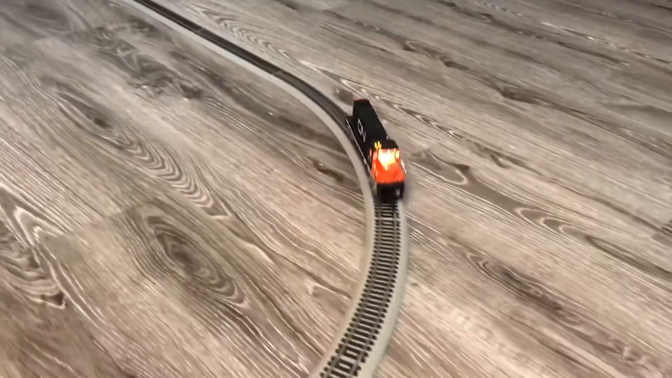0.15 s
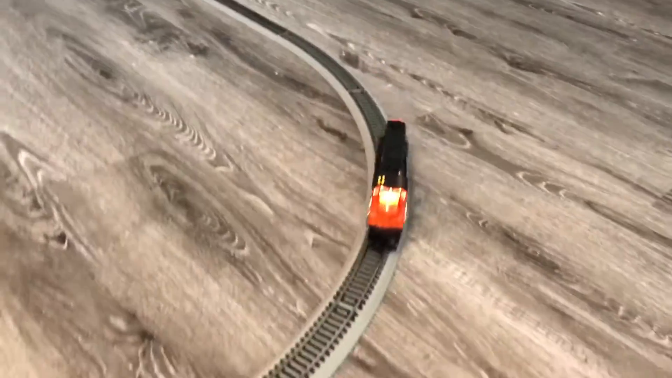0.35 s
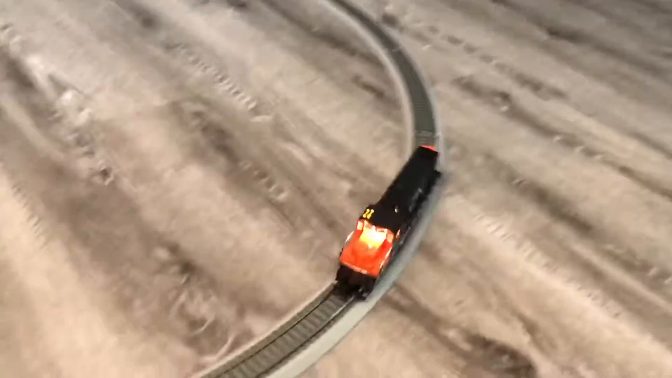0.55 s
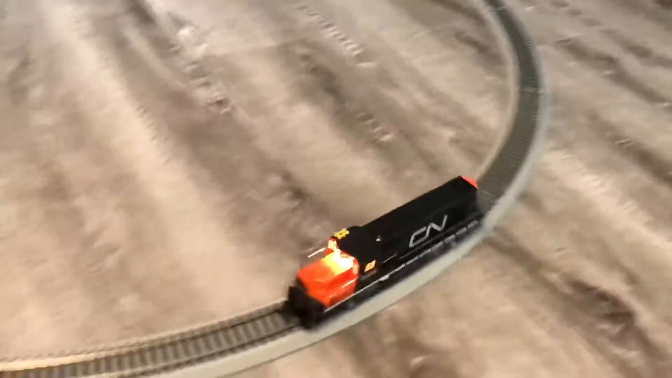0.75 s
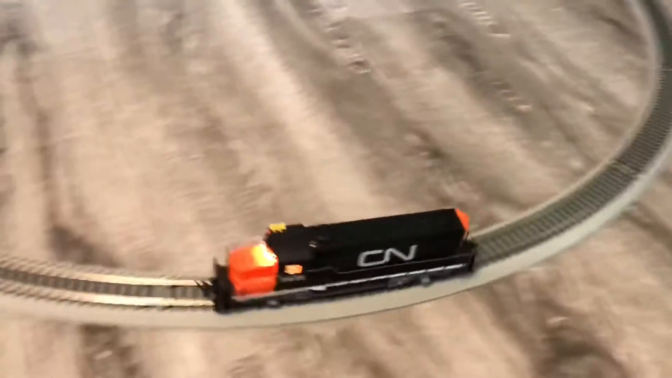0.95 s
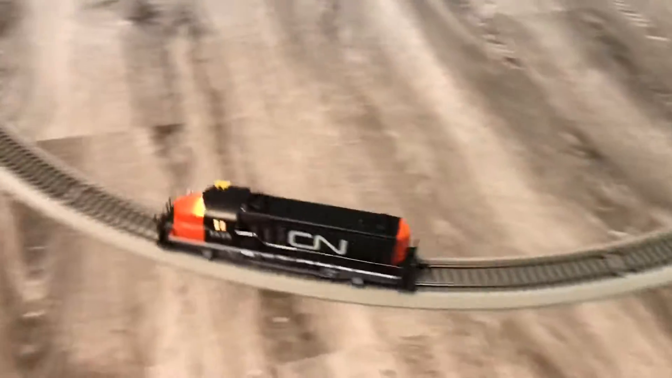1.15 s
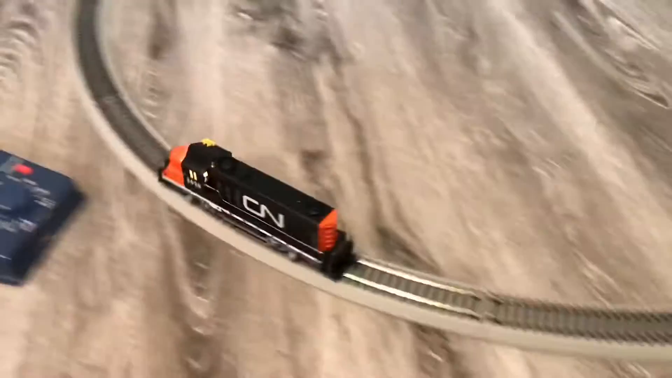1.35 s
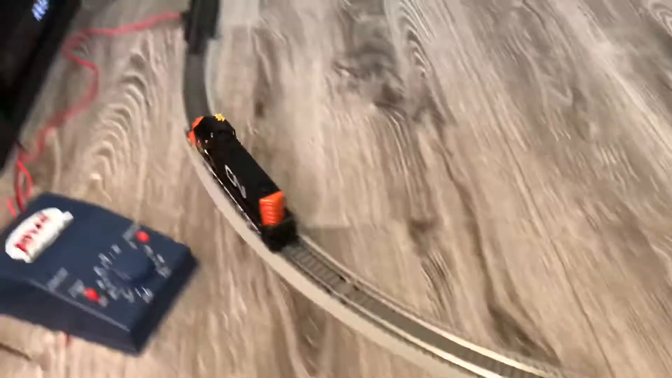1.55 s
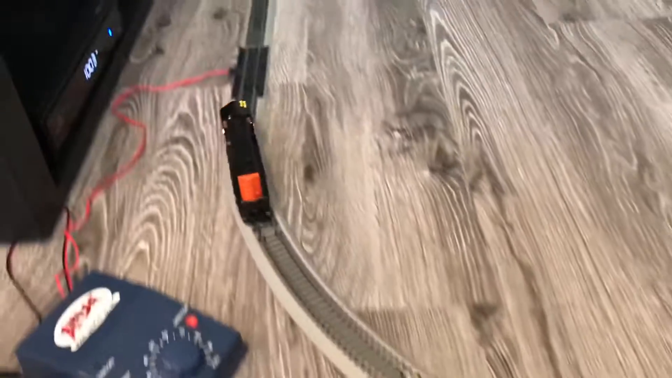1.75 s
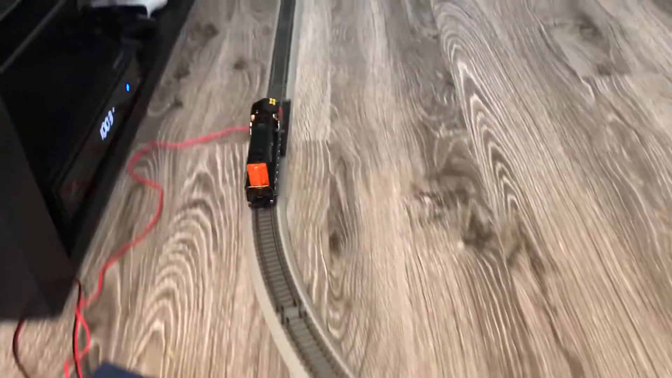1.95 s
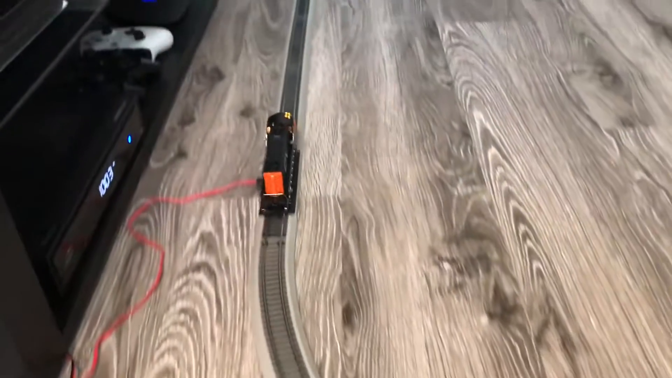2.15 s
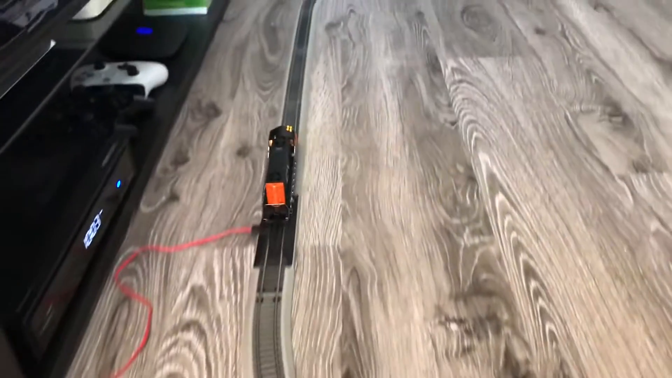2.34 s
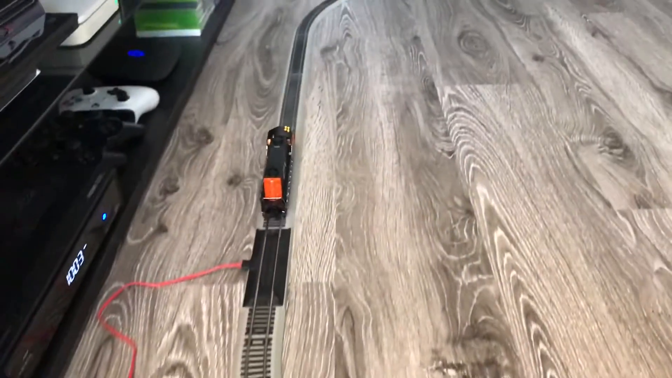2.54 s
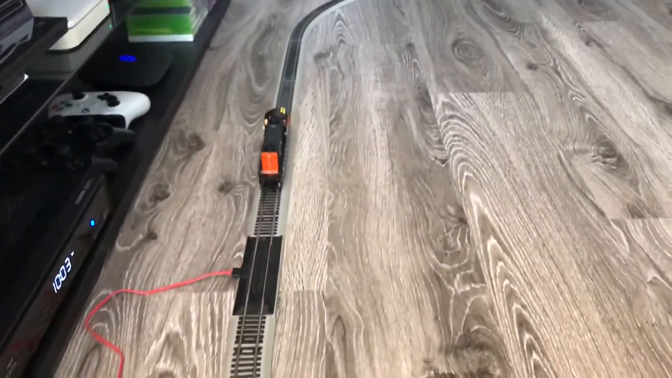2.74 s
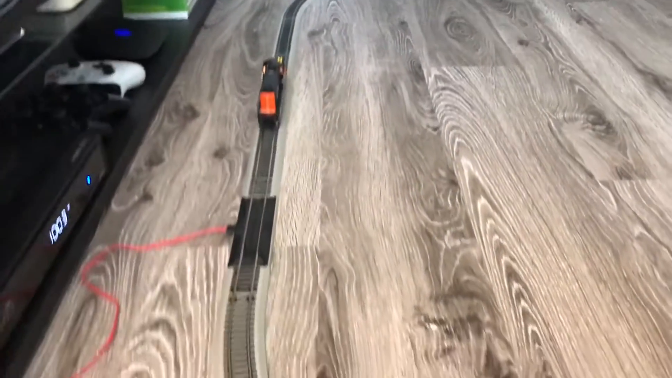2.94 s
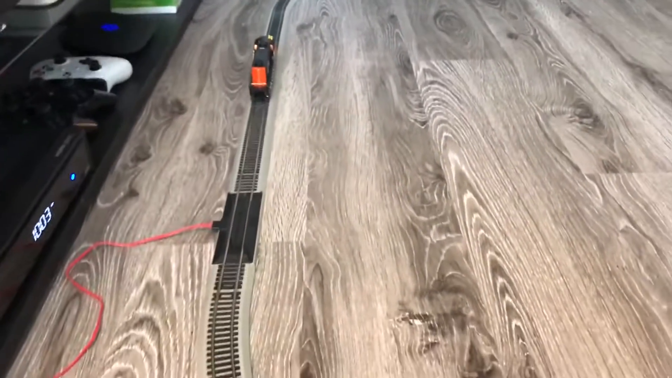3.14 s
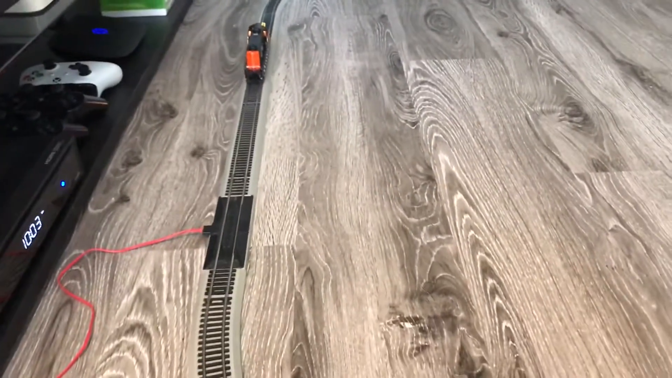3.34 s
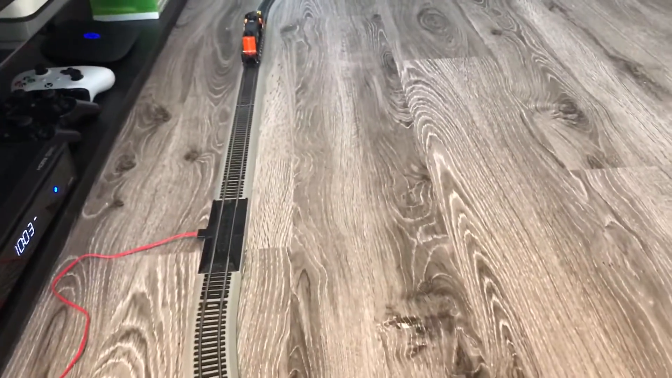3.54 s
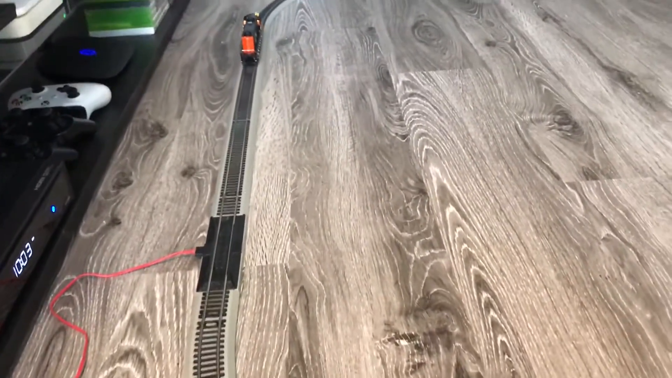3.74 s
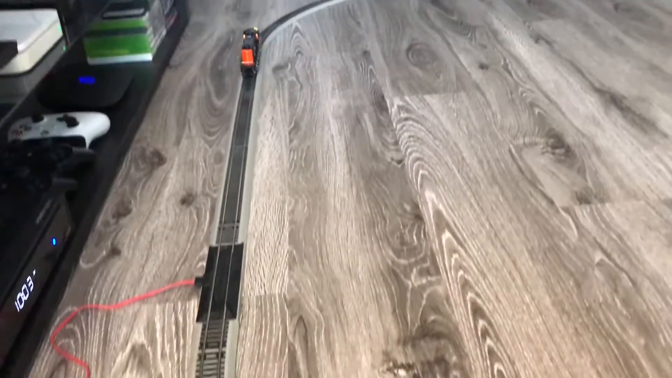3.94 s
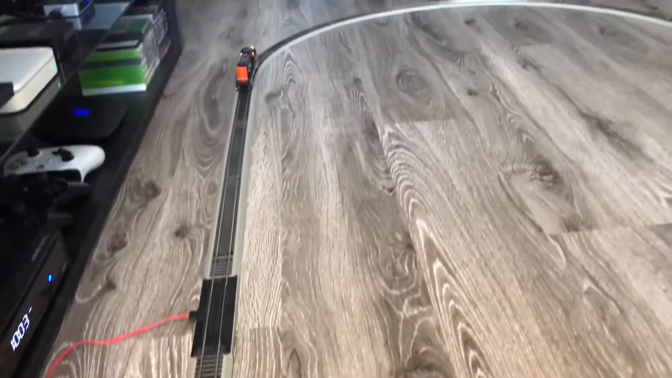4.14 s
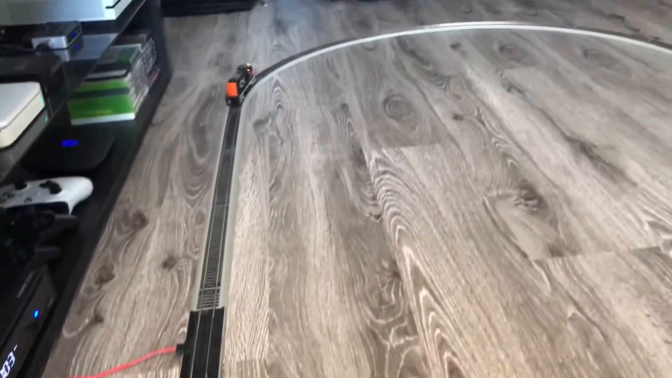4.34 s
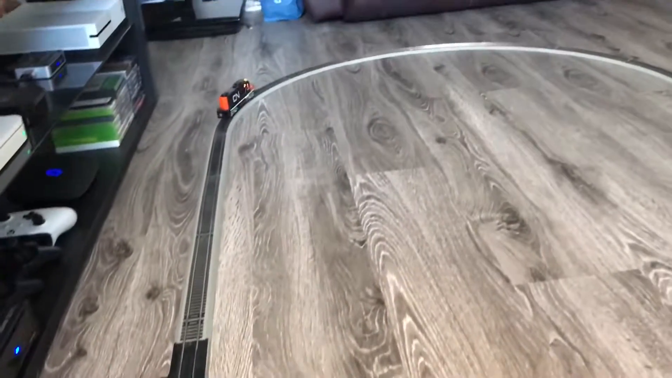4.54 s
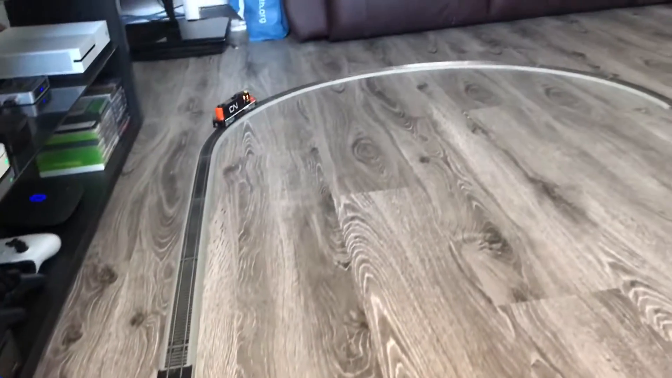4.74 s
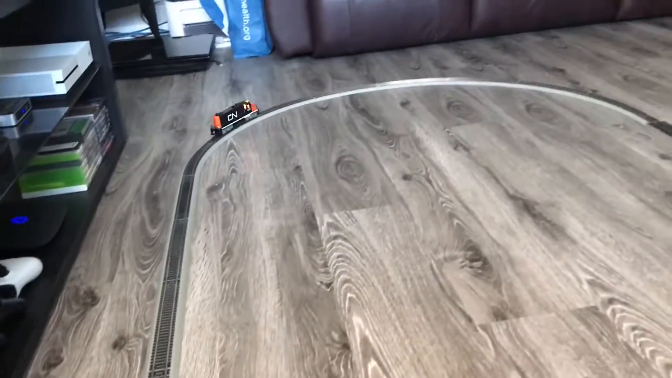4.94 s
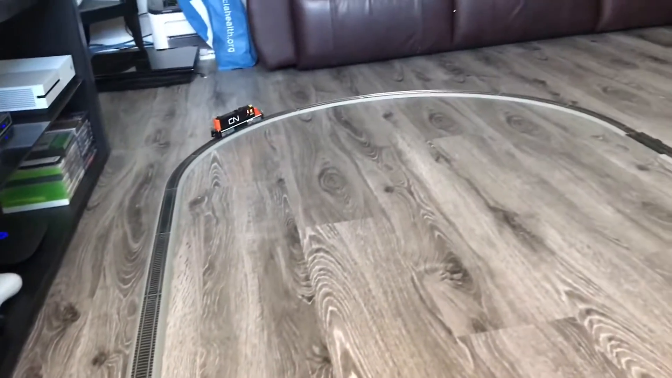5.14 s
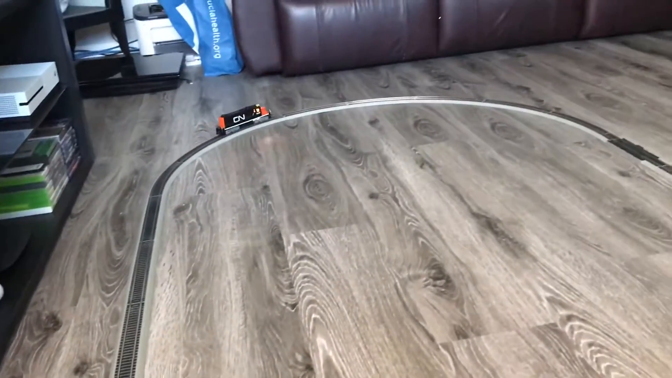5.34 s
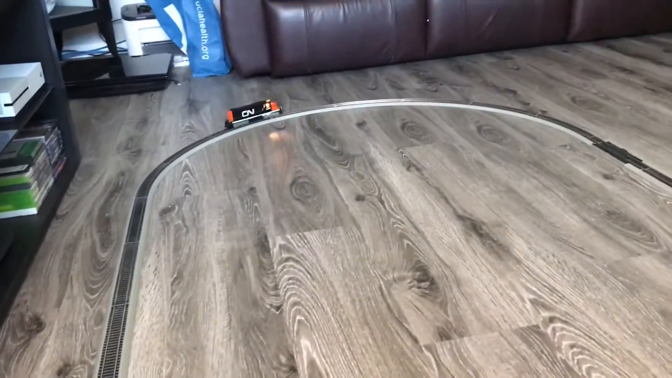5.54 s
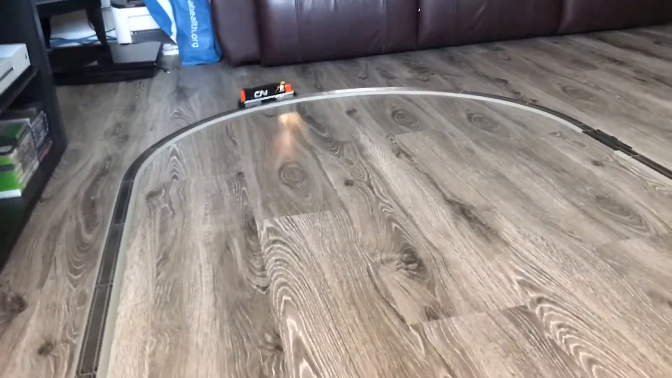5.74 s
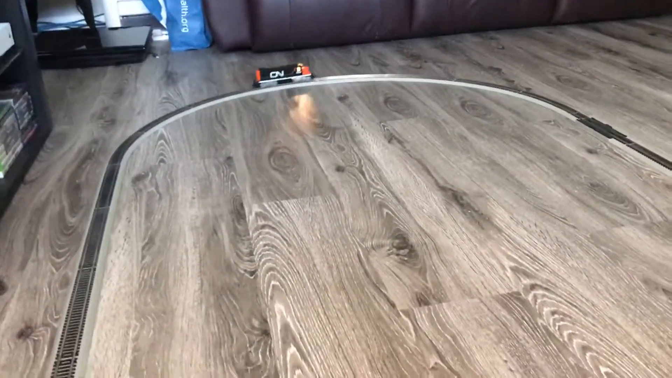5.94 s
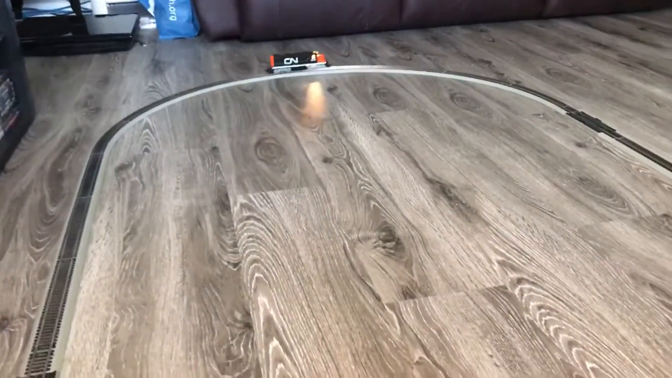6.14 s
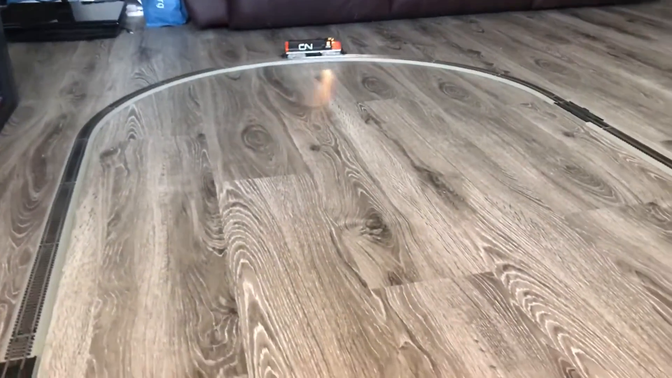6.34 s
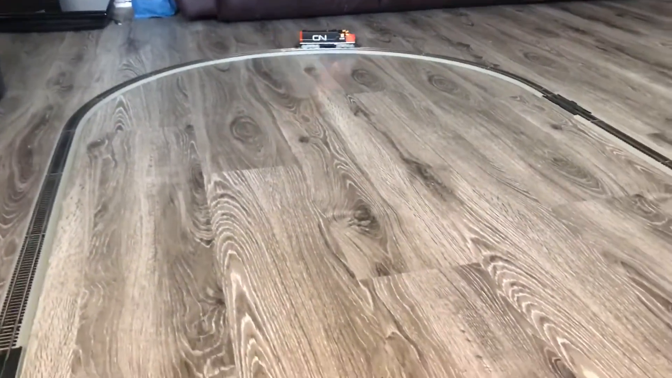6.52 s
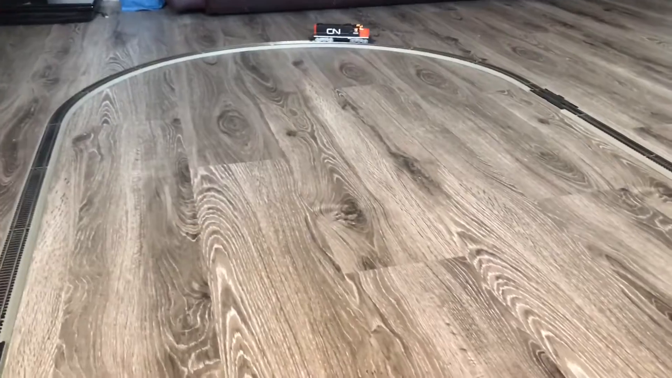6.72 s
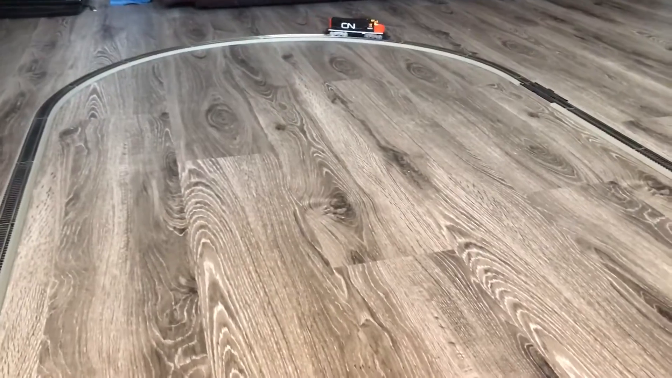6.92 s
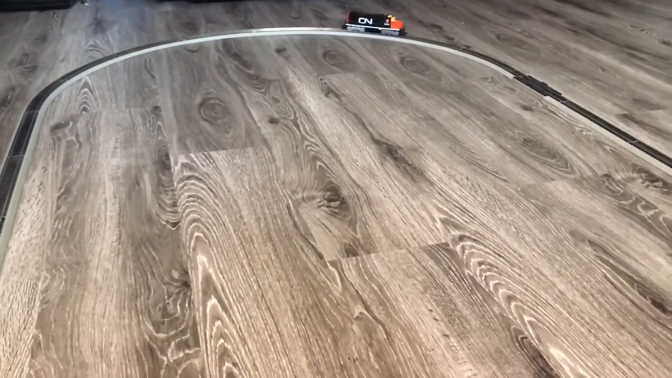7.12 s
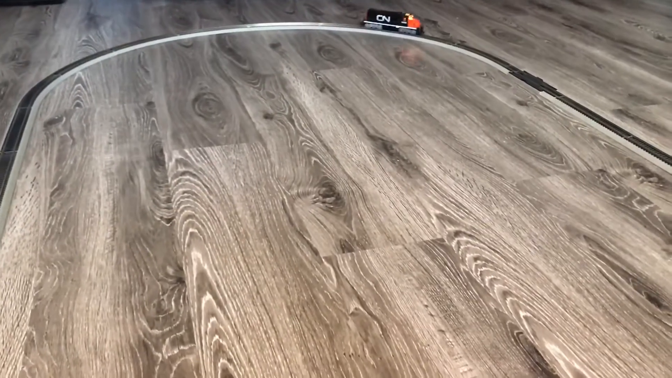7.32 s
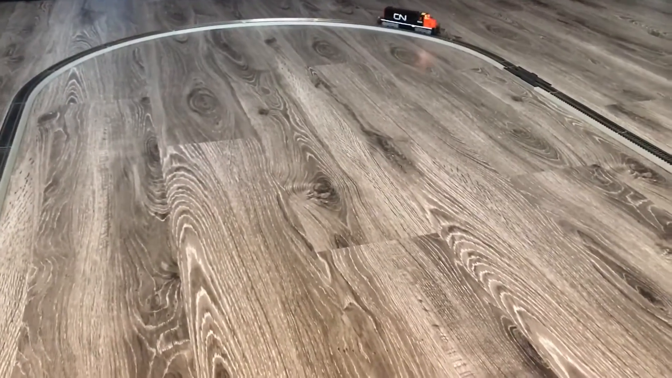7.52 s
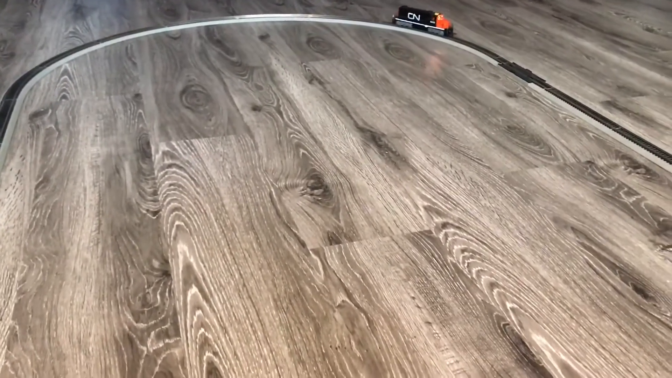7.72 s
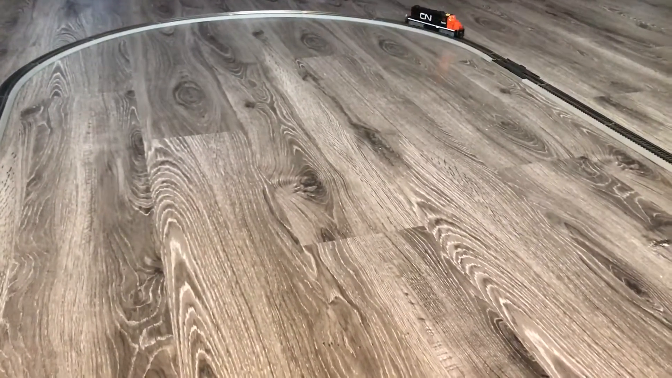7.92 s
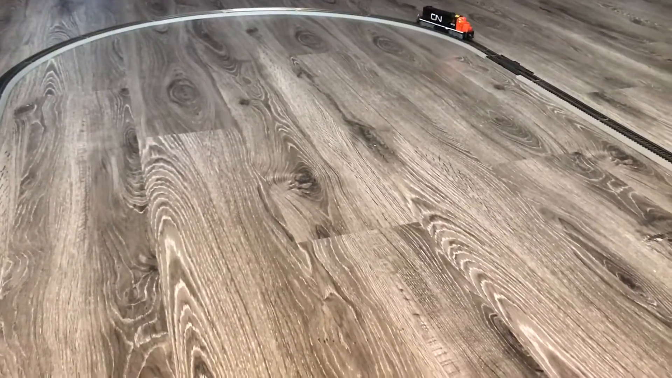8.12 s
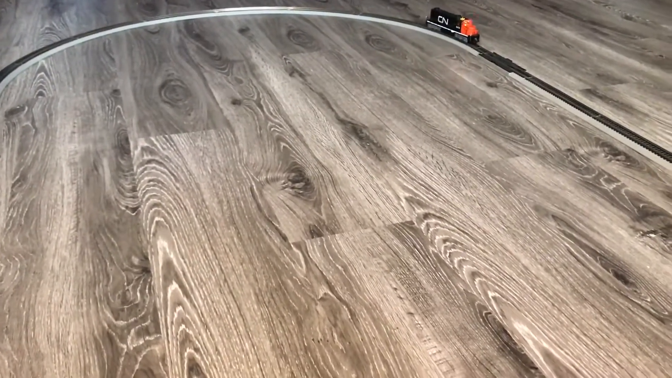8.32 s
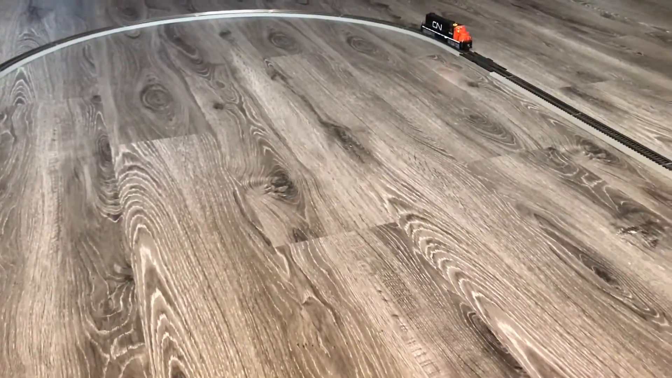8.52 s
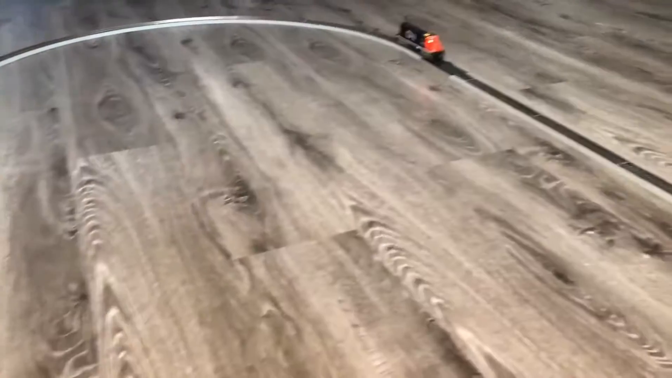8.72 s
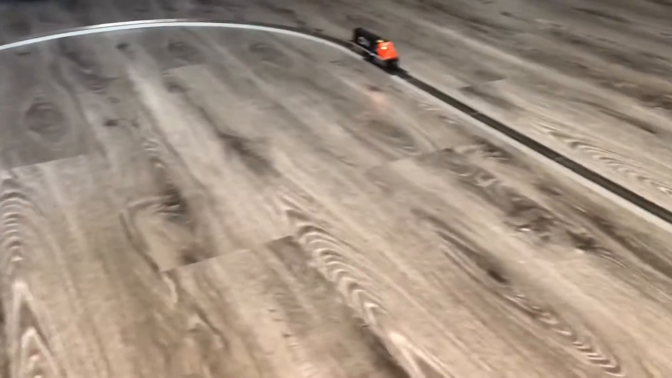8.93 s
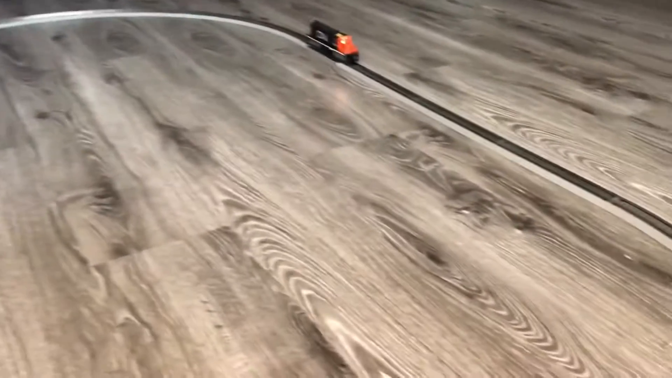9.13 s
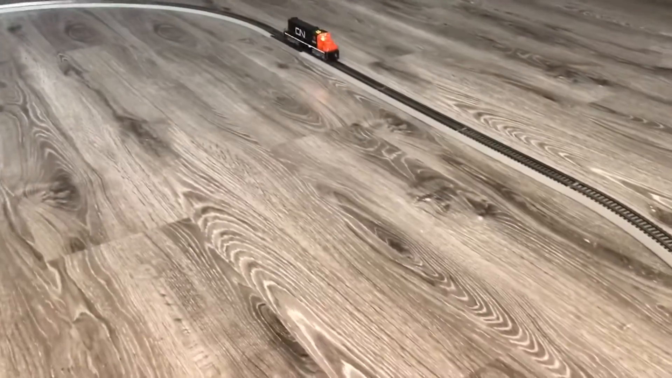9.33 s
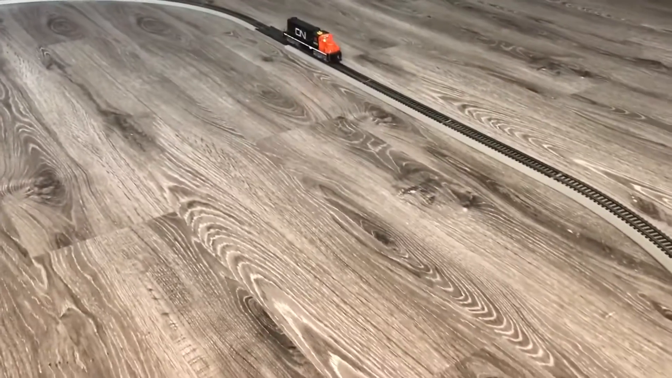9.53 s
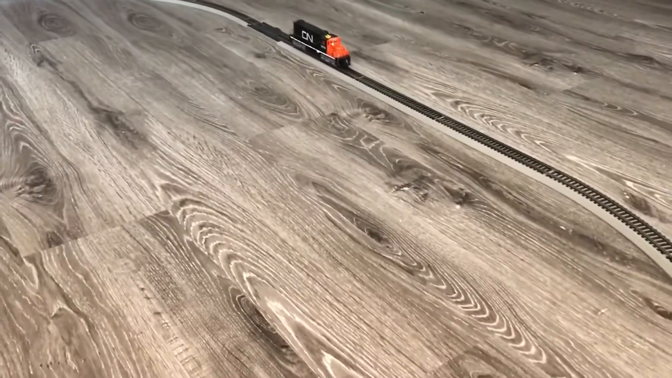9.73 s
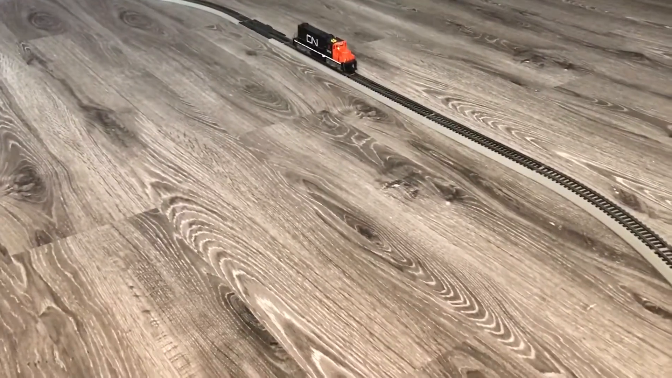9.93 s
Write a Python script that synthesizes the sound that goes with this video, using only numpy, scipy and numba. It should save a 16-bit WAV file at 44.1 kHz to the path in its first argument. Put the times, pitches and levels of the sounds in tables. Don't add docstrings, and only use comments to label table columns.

```python
import sys
import numpy as np
from scipy import signal
from scipy.io import wavfile
from scipy.ndimage import uniform_filter1d
from numba import njit

SR = 44100
rng = np.random.default_rng(int(sys.argv[2]) if len(sys.argv) > 2 else 0)


def ratio(d):
    e = np.asarray(d, float) / 20
    return 10 ** e


def unload_audio(sound):
    columns = np.transpose(np.atleast_2d(sound))
    steps = np.round(np.clip(columns, -1, 1) * 32767)
    wavfile.write(sys.argv[1], SR, steps.astype(np.int16))


N = 439677
T_S = np.arange(N) / SR


def level(x, db):
    return x * ratio(db) / np.sqrt(np.mean(x ** 2))


def columns(table):
    s, *rest = np.transpose(table)
    return [np.interp(T_S, s, c) for c in rest]


def bumps(times_s, sizes, widths_s):
    out = np.zeros(N)
    for s, size, width in zip(times_s, sizes, np.broadcast_to(widths_s, len(times_s))):
        span = slice(max(int((s - 4 * width) * SR), 0), int((s + 4 * width) * SR))
        out[span] += size * np.exp(-((T_S[span] - s) / width) ** 2)
    return out


def add(out, s, x):
    i = int(s * SR)
    out[i:i + len(x)] += x[:N - i]


def walk(rate_hz):
    hold = int(SR / rate_hz)
    held = np.repeat(rng.standard_normal(16000)[:N // hold + 1], hold)
    slewed = uniform_filter1d(uniform_filter1d(held, hold), hold)
    return level(slewed[:N], 0)


def sine(hz):
    return np.sin(2 * np.pi * np.cumsum(hz) / SR)


def strand(hz, rate_hz):
    phase = 2 * np.pi * np.cumsum(hz) / SR
    return walk(rate_hz) * np.cos(phase) + walk(rate_hz) * np.sin(phase)


@njit
def svf(x, hz, width):
    y, b, l = np.empty(len(x)), 0., 0.
    g, k = np.tan(np.pi * hz / SR), width / hz
    for i in range(len(x)):
        v = (b + g * (x[i] - l)) / (1 + g * (g + k))
        b, l, y[i] = 2 * v - b, l + 2 * g * v, k * v
    return y


def band(hz, width_hz):
    once = svf(rng.standard_normal(N), 1. * hz, 1.55 * width_hz)
    return level(svf(once, 1. * hz, 1.55 * width_hz), 0)


# time in seconds, tooth rate in Hz, level in dB.
WHINE = [(0, 1680, -57), (.62, 1754, -49), (.7, 1773, -29.5), (1.16, 1563, -34.5), (1.8, 1690, -44),
         (1.86, 1719, -32), (2.06, 1890, -24.5), (2.38, 1810, -35.5), (2.8, 1835, -35), (4.0, 1780, -37.5),
         (5.3, 1785, -35), (6.1, 1800, -34.5), (7.0, 1750, -37), (7.95, 1610, -36.5), (8.15, 1522, -37),
         (8.7, 1441, -39.5), (9.35, 1667, -34), (9.97, 1520, -39)]
# time in seconds, swell in dB.
GEAR_SURGES = [(.78, -8), (1.56, 7), (1.95, 3), (2.47, 6), (3.64, 4), (4.0, -5), (4.11, 2), (4.2, 3),
               (4.41, 5), (4.66, -4), (4.76, 6.5), (5.11, 3.5), (5.72, 2.5), (5.9, 7), (6.13, 4), (6.32, 7),
               (6.459, 6), (6.56, 5), (6.74, 7), (6.86, 7), (7.219, 7), (7.32, 4), (7.72, -4), (7.86, 3),
               (8.16, 6), (8.41, 6), (8.98, 3.5), (9.2, 3), (9.63, 3), (9.75, -3)]
SURGE_S, SAG_HZ_PER_DB = .035, 6.5
# turn multiple, level in dB.
STRANDS = [(-4, -15), (-3, -16), (-2, -3), (-1, 0.5), (0, 2), (1, 2), (2, -10.5), (3, -9.5)]
TEETH = 24
# time in seconds, level over the others in dB.
CLEAR_STRAND = [
    (0, -20),
    (1.95, -20),
    (2.03, 8),
    (2.2, 8),
    (2.36, 2),
    (2.6, -6),
    (10, -6),
]
# time in seconds, third overtone level in dB.
REAR_OVERTONES = [(0, -62), (1.6, -58), (1.85, -50), (2.2, -48), (3.4, -45.5), (4.4, -52), (6.0, -47.5),
                  (7.5, -50.5), (7.8, -55.5), (9.97, -56)]
SECOND_DB, SECOND_PEAK_S, SECOND_FALL_DB_PER_S = -46.5, 3.46, 3.5
HIGH_DB, HIGH_GAIN_DB_PER_S = -3.5, 0.4
OVERTONE_SHARP = 1.012
SLOW_S, SLOW_HALF_S, SLOW_SECOND_DB = 7.7, .14, 15


def gears():
    hz, db = columns(WHINE)
    surge_db = bumps(*np.transpose(GEAR_SURGES), SURGE_S)
    db = db + surge_db + .8 * walk(40)
    hz = (hz - SAG_HZ_PER_DB * surge_db) * (1 + .008 * walk(10))

    spread = np.interp(T_S, [.98, 1.1, 1.45, 1.53], [1, 2.2, 2.2, 1])
    tone = 0
    for turn, strand_db in STRANDS:
        strand_gain = ratio(strand_db + .9 * walk(22))
        tone = tone + strand_gain * strand(hz * (1 + turn * spread / TEETH), 90)
    clear_db = columns(CLEAR_STRAND)[0]
    clear_gain = ratio(clear_db + 2.5 + 2.0 * walk(30))
    tone = level(tone, 0) + clear_gain * sine(hz * (1 + .012 * walk(35)))
    tone = tone / np.sqrt(1 + ratio(2 * clear_db))

    third_db = columns(REAR_OVERTONES)[0]
    high_db = third_db + HIGH_DB + HIGH_GAIN_DB_PER_S * T_S + 1.1 * walk(2.51)
    second_db = SECOND_DB - SECOND_FALL_DB_PER_S * np.abs(T_S - SECOND_PEAK_S)
    second_db = np.minimum(second_db, third_db + 8)
    second_db = second_db + bumps([SLOW_S], [SLOW_SECOND_DB], SLOW_HALF_S)
    even_hz = OVERTONE_SHARP * uniform_filter1d(hz, size=9000) * (1 + .013 * walk(16))
    upper = ratio(second_db + 1.5 * walk(25)) * strand(2 * even_hz, 800)
    upper = upper + ratio(third_db + 2.2 * walk(20)) * strand(3 * even_hz, 560)
    upper = upper + ratio(high_db) * (strand(4 * even_hz, 750) + ratio(-2.0) * strand(5 * even_hz, 850))

    brush_db = np.interp(T_S, [7, 7.6], [-66, -58]) + 1.3 * walk(12)
    brushes = ratio(brush_db) * strand(np.full(N, 9900.), 1200)
    return tone * ratio(db) + upper + brushes


RATTLE_DB, RATTLE_S = 11.5, .022


def rattles(hz, count=70):
    out, t = np.zeros(N), np.arange(2048) / SR
    for place, detune, size in rng.random((count, 3)):
        swell = np.sin(np.pi * np.minimum(t / (RATTLE_S * (1 + size)), 1))
        song = np.sin(2 * np.pi * hz * (.94 + .12 * detune) * t)
        add(out, place * N / SR, ratio(RATTLE_DB - 7.4 * size) * swell * song)
    return out


# time in seconds, distance loss in dB, side-on share 0-1.
PATH = [(0, -3, 0.5), (.3, -3.5, 0.1), (.75, 0, 0.8), (1.05, 0.5, 1), (1.38, 1.5, 1), (1.55, .5, 0.31),
        (1.95, 0.5, 0.5), (2.3, -8, 0.5), (2.55, -7, 0.4), (2.69, -3.5, 0.53), (2.8, -8, 0.4),
        (3.2, -8.5, 0.6), (4.05, -12, 0.44), (5.7, -11.5, 0.78), (6.6, -12, 1), (8.75, -15, 0),
        (9.1, -11, 0.56), (9.97, -13.5, 0.56)]
PART_HZ = [800, 2700, 8000, 13000]
# level alongside in dB, share of the distance loss, gain side-on in dB,
# dB per dB of speed.
PARTS = [
    (-45, 0.89, 0.17, 0.34),
    (-35.5, 0.97, -0.55, 0.9),
    (-42.5, 0.21, 2.5, 0.5),
    (-46.5, 0.66, 5.5, 1),
]
# frequency in Hz, level in dB.
ROLL_SHAPE = [(350, -11.5), (600, -6), (800, -1.5), (1100, 2.5), (1600, 4), (2700, 0.5), (3700, -3),
              (4500, -4.5), (6500, -3), (9300, 0.5), (10500, -4), (13000, -2.5), (15000, -7), (16000, -2.5)]
CRUISE_HZ = 1770
WHEEL_HZ, WHEEL_DB = 22.26, 2.15


def rolling():
    loss_db, side = columns(PATH)
    speed_db = 20 * np.log10(uniform_filter1d(columns(WHINE)[0], size=9000) / CRUISE_HZ)
    parts_db = np.array([db + share * loss_db + side_db * side + pace * speed_db
                         for db, share, side_db, pace in PARTS])
    parts_db = parts_db - 10 * np.log10([[400], [1050], [3400], [4500]])
    parts_db[2:] = uniform_filter1d(parts_db[2:], size=7000, axis=1)
    shape_hz, shape_db = np.transpose(ROLL_SHAPE)

    near = np.interp(T_S, [0, 2.1, 2.8, 10], [1, 0.64, 0.43, 0.4])
    throb_db = WHEEL_DB * np.sin(2 * np.pi * WHEEL_HZ * T_S + walk(1.97)) ** 2 + 1.0 * walk(25)
    grit_db = np.minimum(10.2 * rng.exponential(size=N // 64 + 1), 36)
    grit = uniform_filter1d(ratio(grit_db).repeat(64)[:N], size=40)

    out, patch = 0, walk(4.6)
    for hz in 400 * 2 ** (np.arange(33) / 6):
        place = np.interp(np.log(hz), np.log(PART_HZ), np.arange(4))
        low = min(int(place), 2)
        db = parts_db[low] + (place - low) * (parts_db[low + 1] - parts_db[low])
        db = db + np.interp(np.log(hz), np.log(shape_hz), shape_db) + 10 * np.log10(0.076 * hz)
        db = db + 8 * (near - .45) * np.exp(-(np.log(hz / 4400) / 0.32) ** 2)
        patch = .4 * patch + .9 * walk(5)
        db = db + min(hz / 4000, 1) * near * throb_db + 0.7 * patch + 1.2 * walk(18)
        rattle_gain = min(1800 / hz, 1) ** .5 * (hz < 11000)
        out = out + (band(hz, 0.16 * hz) + rattle_gain * rattles(hz)) * ratio(db)
    return out * np.sqrt(1 + 0.051 * near * grit)


# time in seconds, peak in dB, half length in seconds, pitch in Hz.
BUZZES = [(.84, -30, 0.072, 1165), (1.159, -33, .08, 1216), (1.438, -30, .06, 1204),
          (1.621, -30, 0.054, 1174), (2.143, -33, 0.046, 1227), (2.782, -33, 0.068, 1194),
          (3.363, -36, 0.14, 1243), (4.352, -40, 0.072, 1145), (6.6, -47, .15, 1090),
          (7.75, -33, .03, 1221), (7.912, -36, .035, 1310), (8.707, -29.5, 0.089, 1260),
          (8.864, -29, .04, 1206), (9.096, -36, 0.11, 1282), (9.9, -32, 0.056, 1227)]
# time in seconds, pitch in Hz, level in dB.
SHELL = [
    (0, 3100, -40),
    (.25, 3300, -30),
    (.42, 3300, -36.5),
    (.75, 2520, -39),
    (.95, 2800, -48),
    (1.35, 4050, -35),
    (1.65, 2800, -41),
    (2.2, 2800, -63),
    (2.5, 2700, -46),
]
GROWL_DB, GROWL_LOSS = -37.5, 4.5


def chassis():
    times_s, buzz_db, half_s, buzz_hz = np.transpose(BUZZES)
    growl_hz = np.interp(T_S, times_s, buzz_hz)
    growl = ratio(GROWL_DB + GROWL_LOSS * columns(PATH)[0])
    growl_db = 20 * np.log10(growl + bumps(times_s, ratio(buzz_db), half_s))
    _, last_hz, last_db = SHELL[-1]
    shell_hz, shell_db = columns(SHELL + [(3.2, last_hz, last_db), (3.6, last_hz, -64)])
    shell = strand(.88 * shell_hz, 1500) + strand(1.15 * shell_hz, 1500)
    return ratio(growl_db - 10.0) * strand(growl_hz, 300) + ratio(shell_db - 6) * shell


# frequency in Hz, width in Hz, level in dB.
BOOM = [
    (59.8, 13, 1),
    (81.6, 25, -0.5),
]
# frequency in Hz, width in Hz, level in dB.
DRONE = [
    (131, 50, 2),
    (170.4, 22, -2.5),
    (219, 90, 3),
    (275, 39, 0.5),
    (353, 55, 1),
]
# time in seconds, boom swell in dB, drone swell in dB.
THUDS = [
    (.75, -1, 3.5),
    (1.19, 0, 3.5),
    (1.6, 5.5, .5),
    (1.8, 3, 2.5),
    (2.08, 4, 2),
    (2.47, 10, -2.5),
    (3.44, 5, -5),
    (4.39, -1, 6),
    (5.08, 2, -2),
    (8.63, 1.5, -4),
]
THUD_S = 0.079
BOOM_DB, BOOM_LOSS, DRONE_DB, DRONE_LOSS = -55, 0.2, -51.5, 0.9
RUMBLE_DB, RUMBLE_S, RUMBLE_HALF_S = 2, 9.58, 0.68
HUM_HZ, HUM_DB, HUM_ON_S, HUM_PEAK_S, HUM_OFF_S, HUM_EDGE_S = 178, -59.5, 7.4, 8.43, 9.1, .12


def boards():
    loss_db = columns(PATH)[0]
    times_s, boom_swell_db, drone_swell_db = np.transpose(THUDS)
    boom_db = BOOM_DB + BOOM_LOSS * loss_db + bumps(times_s, boom_swell_db, THUD_S)
    drone_db = DRONE_DB + DRONE_LOSS * loss_db + bumps(times_s, drone_swell_db, THUD_S)
    drone_db = drone_db + bumps([RUMBLE_S], [RUMBLE_DB], RUMBLE_HALF_S)
    boom = sum(band(hz, width_hz) * ratio(db + 2.3 * walk(3.3)) for hz, width_hz, db in BOOM)
    drone = sum(band(hz, width_hz) * ratio(db + 2.0 * walk(2.46)) for hz, width_hz, db in DRONE)

    hum_db = columns([(HUM_ON_S - HUM_EDGE_S, -90), (HUM_ON_S + HUM_EDGE_S, HUM_DB - 7), (HUM_PEAK_S, HUM_DB),
                      (HUM_OFF_S - HUM_EDGE_S, HUM_DB - 8), (HUM_OFF_S + HUM_EDGE_S, -90)])[0]
    hum_hz = HUM_HZ * (1 + 0.00624 * walk(2.4))
    hum = ratio(hum_db + 1.5 + 0.89 * walk(6)) * sine(hum_hz)
    return level(boom, 0) * ratio(boom_db) + level(drone, 0) * ratio(drone_db) + hum


def ring(hz, t60_s, db):
    t = np.arange(4096) / SR
    return ratio(db - 60 * t / t60_s) * np.sin(2 * np.pi * hz * t)


# time in seconds, first axle in dB, second axle in dB, ring in Hz.
BOGIES = [(.205, -33, -36, 3150), (.3392, -39, -50, 3160), (.47, -35, -34, 3400), (.602, -33.5, -32, 2420),
          (0.7368, -31, -34, 2400), (0.8688, -39, -32, 2400), (0.9994, -38, -30, 2930),
          (1.262, -32, -31, 2930), (1.589, -42, -42, 2660), (1.655, -30.5, -40, 2390),
          (1.788, -37, -28.5, 3450), (1.9235, -27.5, -36, 2330)]
AXLE_GAP_S = .0468
# time in seconds, level in dB, ring in Hz.
CLICKS = [(1.1515, -36, 3240), (1.4421, -33, 2380), (1.503, -33, 3660), (1.8133, -41, 2920),
          (2.0807, -31.5, 2710), (2.151, -46.5, 2350), (2.4148, -41, 2700), (2.588, -36, 2472),
          (2.6743, -36, 2400), (4.2008, -45, 3180), (4.2539, -45, 3230), (4.6086, -42, 3250),
          (4.9706, -42, 3330), (5.879, -37.5, 3440), (8.738, -46, 3241), (9.1024, -41, 3134),
          (9.8198, -48, 2513)]
BODY_OVER_TICK_DB = 18
# time in seconds, peak in dB, ring in Hz.
KNOCKS = [
    (0.749, -39, 269),
    (1.142, -38, 156),
    (1.778, -32.5, 275),
    (4.408, -47, 304.5),
]


def joints():
    out, t = np.zeros(N), np.arange(4096) / SR
    axles = [(s + k * AXLE_GAP_S, dbs[k], hz) for s, *dbs, hz in BOGIES for k in range(2)]
    for s, tick_db, hz in axles + CLICKS:
        body_db = tick_db + BODY_OVER_TICK_DB
        grains = rng.standard_normal((2, 4096))
        tick = svf(grains[0], 12000., 9000.) * ratio(tick_db + 5 - 60 * t / .028)
        burst = svf(grains[1], 4000., 5000.) * ratio(body_db - 8 - 60 * t / .05)
        add(out, s, tick + burst + ring(hz, 0.035, body_db - 11.5))
    for s, db, hz in KNOCKS:
        add(out, s, ring(hz, 0.17, db) + ring(1.41 * hz, 0.18, db - 6.5))
    return out


@njit
def walls(x, lags, gain, damp):
    line, soft, out = np.zeros((8, 4096)), np.zeros(8), np.zeros(len(x))
    for i in range(len(x)):
        total = 0.
        for k in range(8):
            soft[k] += (1 - damp) * (gain[k] * line[k, (i - lags[k]) & 4095] - soft[k])
            total += soft[k]
            out[i] += soft[k] * (1 - 2 * (k % 2))
        for k in range(8):
            line[k, i & 4095] = x[i] + soft[k] - total / 4
    return out


ROOM_T60_S, ROOM_DB, ROOM_DAMP = .3, -6, 0.44


def room(x):
    lags = rng.integers(500, 2400, size=8)
    wet = walls(x, lags, ratio(-60 * lags / SR / ROOM_T60_S), ROOM_DAMP)
    return (x + ratio(ROOM_DB - 9.5) * wet) / np.sqrt(1 + ratio(2 * ROOM_DB))


FADE_FROM_S, FADE_DB_PER_S = 9.84, 84


def scene():
    fade = ratio(-FADE_DB_PER_S * np.maximum(T_S - FADE_FROM_S, 0))
    engine = room(gears() + joints() + chassis()) + rolling()
    return (engine * fade + boards())[None]


def top_cut(x):
    return signal.sosfilt(signal.butter(12, 16310, fs=SR, output="sos"), x)


MIC_DB, TOP_HZ = -69, 15750


def record(dry):
    hiss = level(np.diff(rng.standard_normal(N + 1)), MIC_DB)
    cut = signal.ellip(10, .1, 50, TOP_HZ, fs=SR, output="sos")
    mix = signal.sosfilt(cut, dry + hiss)
    return top_cut(mix)


dry = scene()
out = record(dry)
unload_audio(out)
```